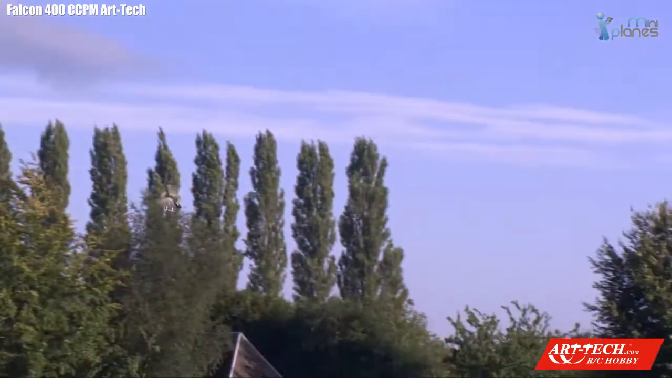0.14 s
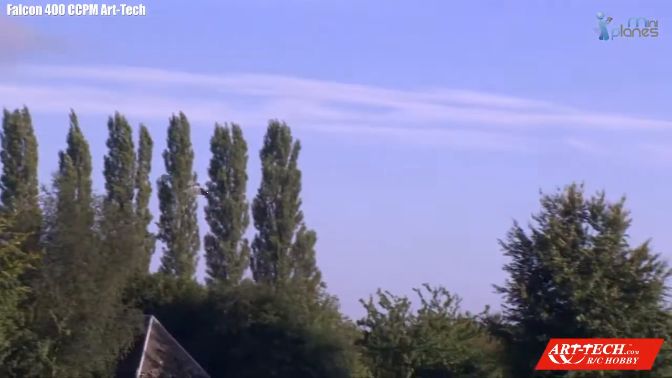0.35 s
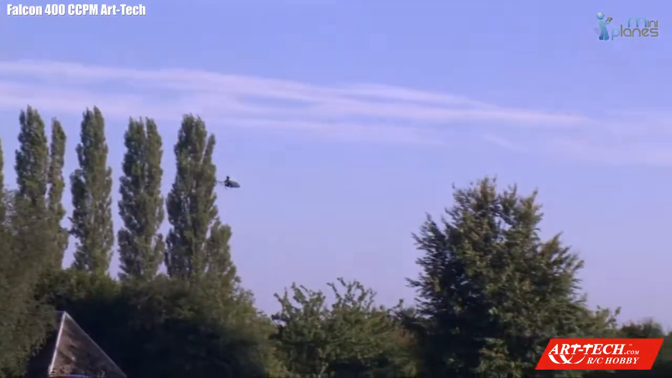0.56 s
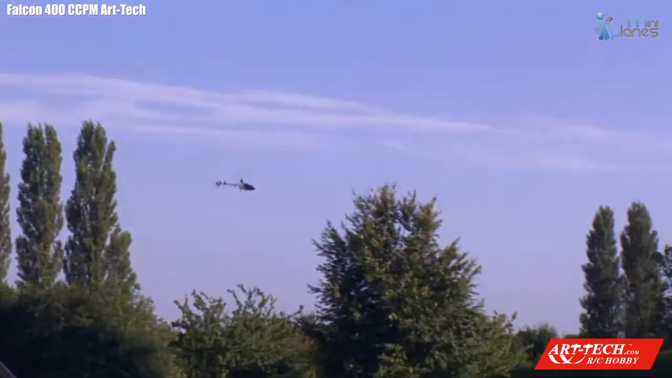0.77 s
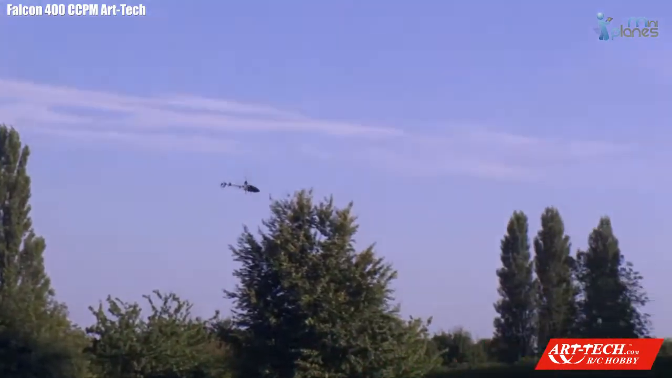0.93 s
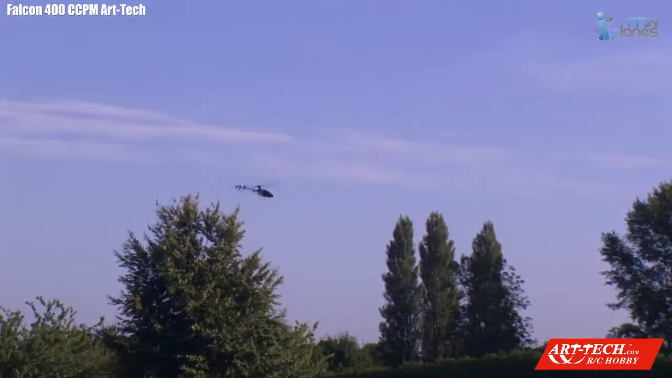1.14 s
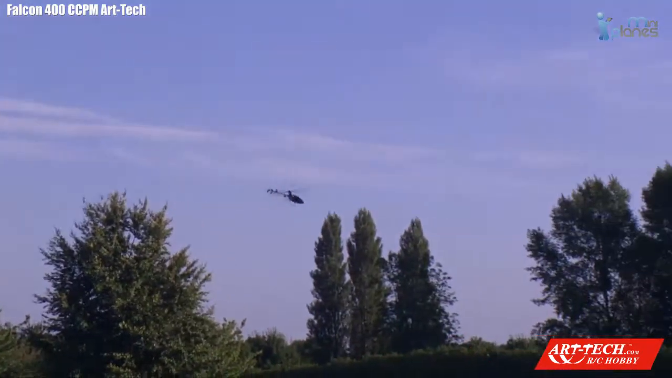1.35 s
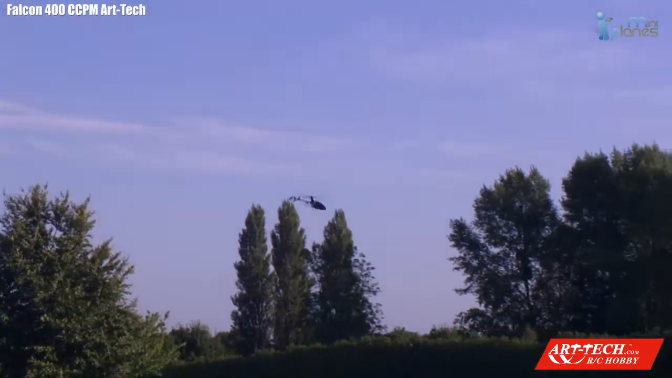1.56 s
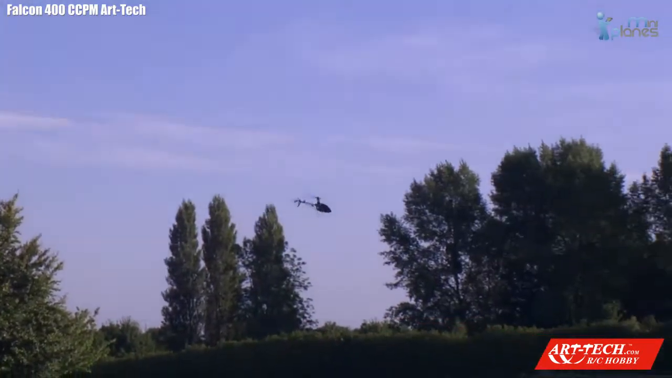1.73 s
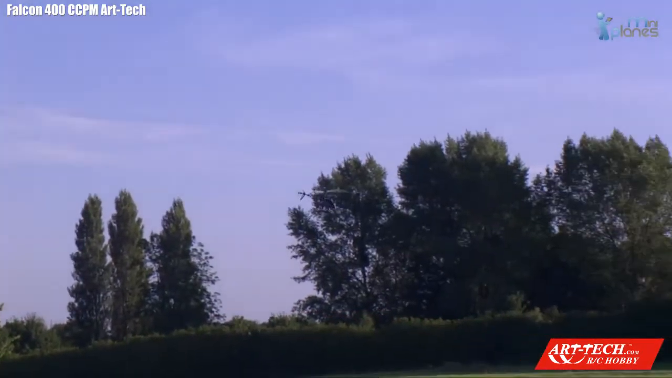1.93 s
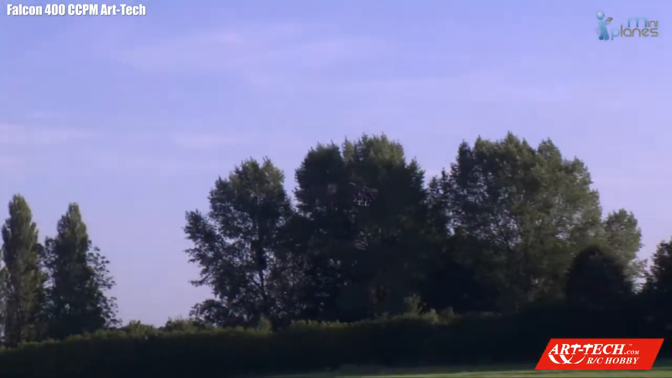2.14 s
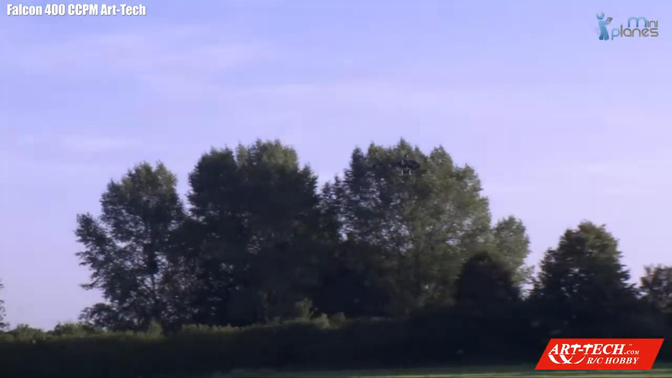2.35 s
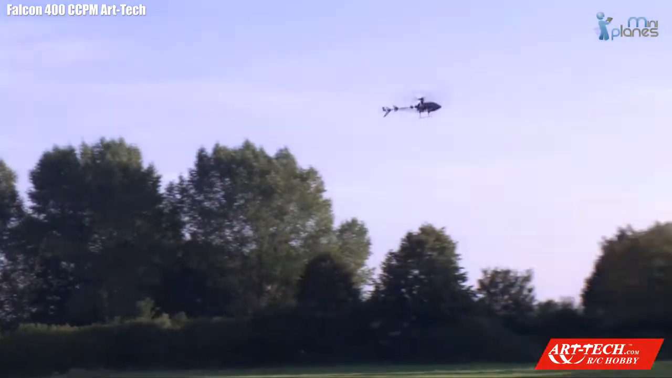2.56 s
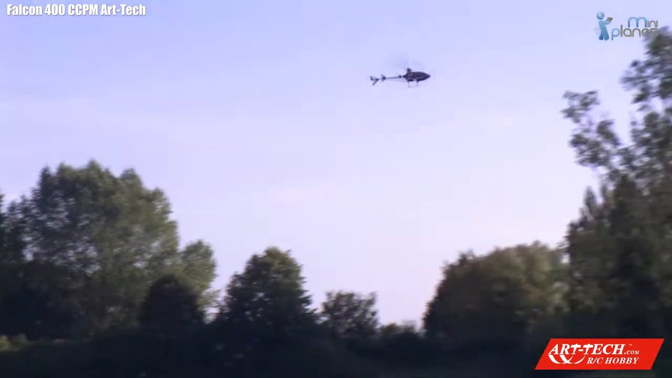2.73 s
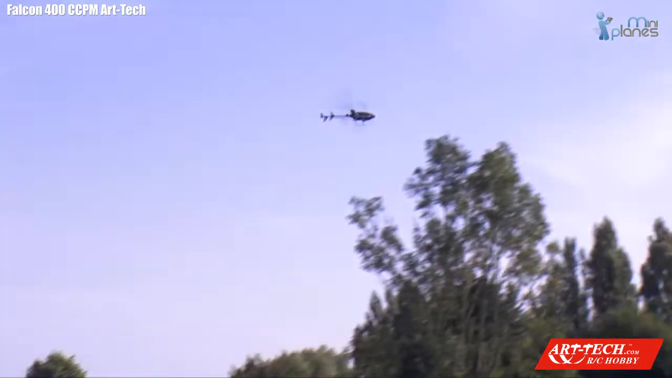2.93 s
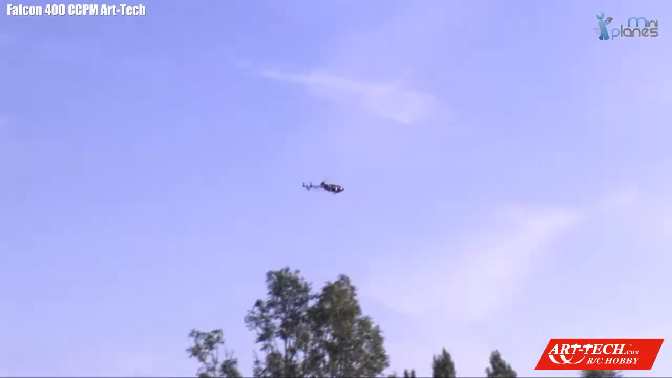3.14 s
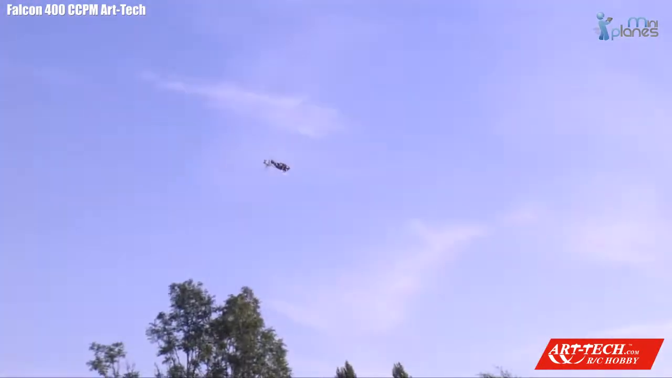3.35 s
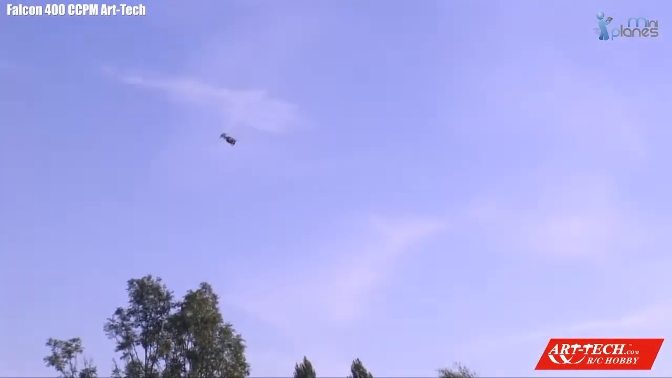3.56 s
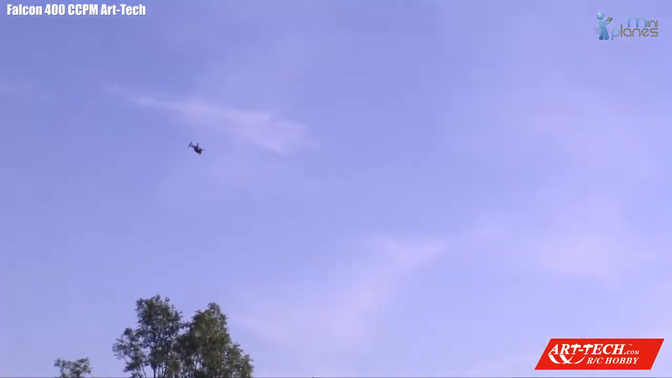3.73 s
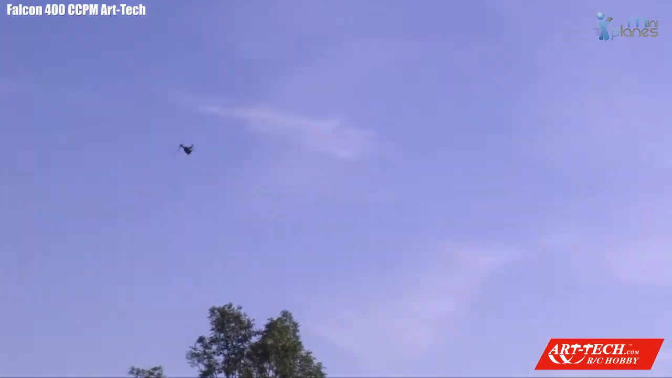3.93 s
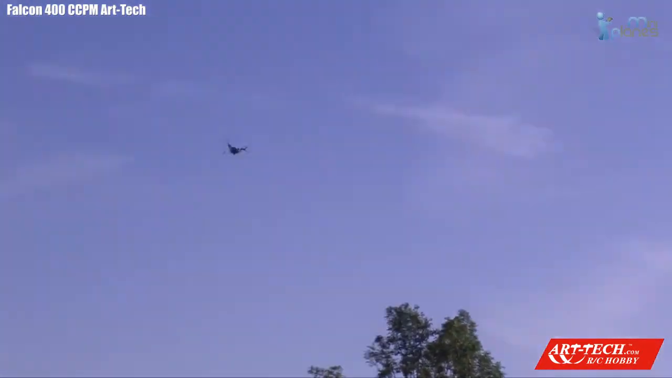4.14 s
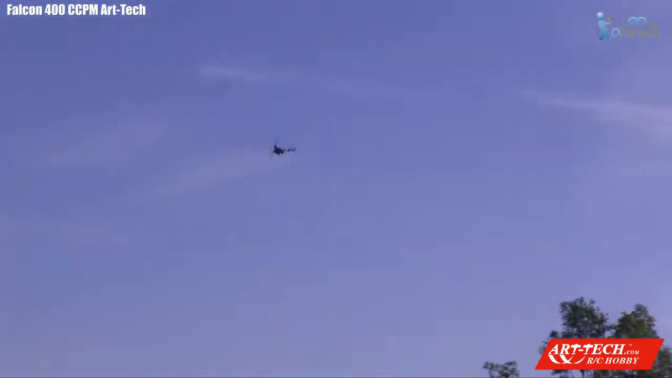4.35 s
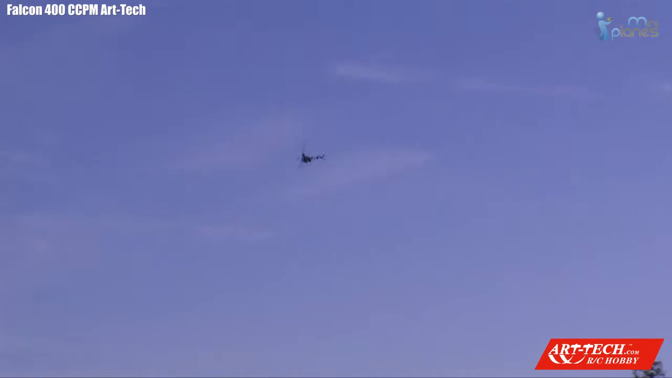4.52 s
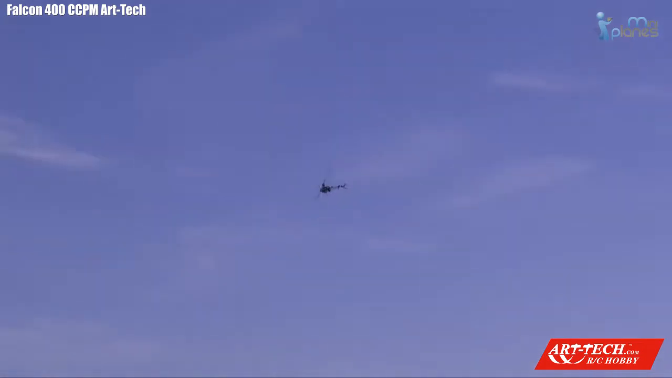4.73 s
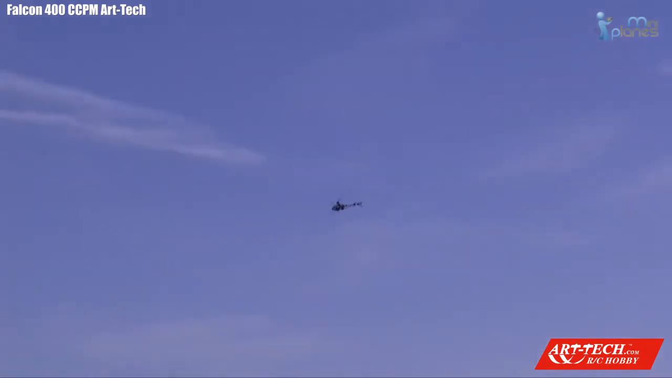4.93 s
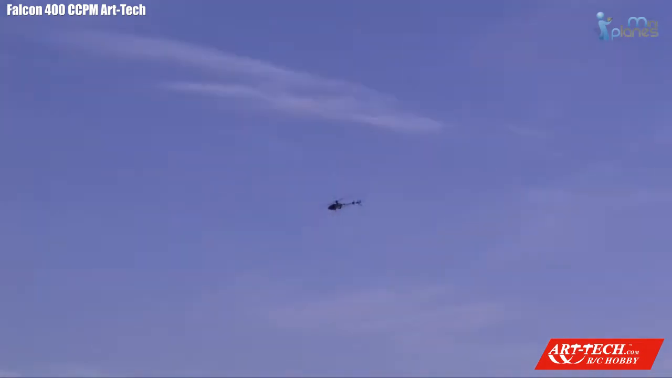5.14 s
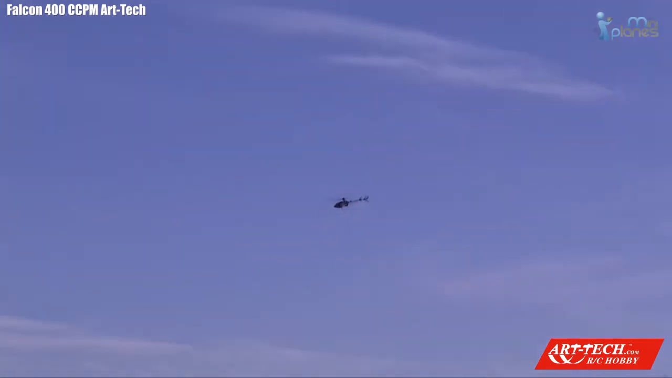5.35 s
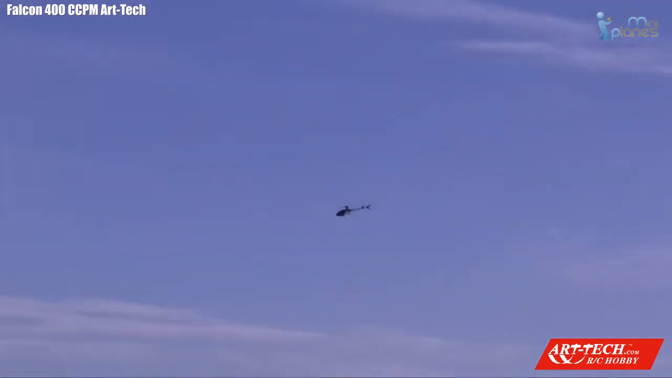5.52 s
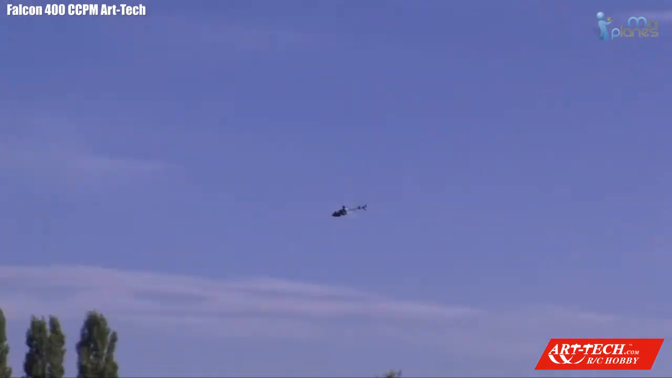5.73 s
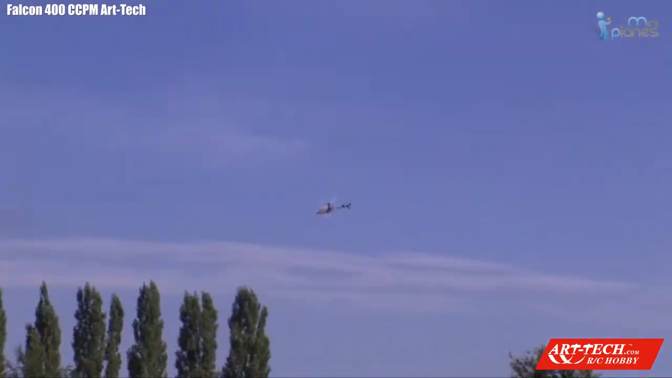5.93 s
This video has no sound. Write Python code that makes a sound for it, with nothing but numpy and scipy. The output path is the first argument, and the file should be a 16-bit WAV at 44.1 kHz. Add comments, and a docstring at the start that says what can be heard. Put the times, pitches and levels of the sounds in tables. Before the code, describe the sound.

Outdoors, the thin, high whine of an electric model helicopter rises and falls gently over surging gear hiss and fluttering rotor noise. It comes closer, turns with a short rasp and a faint buzz, then moves away, still clearly audible. As it passes, wind buffets the microphone in loud, uneven low thumps that die down over a second or two. The field behind it is very quiet.

```python
"""Gear whine and hiss over a blade-chopped rotor swish: a small electric model helicopter above a field.
It comes closest near 3 s, turns from nose-on to tail-on with a rasp and a buzz, and moves off.
One motor angle drives the gear partials and both rotors; trees scatter the whine back.
A gust buffets the microphone with rumble and thumps as the helicopter passes."""
import sys
import numpy as np
from scipy import signal
from scipy.fft import rfft, irfft, next_fast_len
from scipy.io import wavfile
from scipy.ndimage import uniform_filter1d, map_coordinates

SR = 44100
rng = np.random.default_rng(int(sys.argv[2]) if len(sys.argv) > 2 else 0)


def to_wav(s):
    """Save 16-bit WAV."""
    ch = np.atleast_2d(s).T  # columns
    pcm = np.round(np.clip(ch, -1, 1) * 32767)  # PCM
    wavfile.write(sys.argv[1], SR, pcm.astype(np.int16))


N = 263718
TIME_S = np.arange(N) / SR

# Table levels precede the trims in the functions. Swells are bell-shaped.
# motor speed, Doppler included: time_s, speed_hz
MOTOR_SPEED = [(0.0, 280.3), (0.37, 282.2), (0.61, 275.5), (0.83, 271.2), (1.0, 269.5), (1.14, 271.2),
               (1.31, 269.1), (1.6, 268.7), (1.92, 279.3), (2.44, 279.2), (2.6, 270.4), (2.84, 262.7),
               (3.01, 261.2), (3.55, 265.5), (3.93, 268.0), (4.22, 267.4), (4.49, 262.7), (5.05, 262.5),
               (5.45, 265.2), (5.97, 274.0)]
# rotor rush, the base for swish, drone, hiss and fizz: time_s, level_db
RUSH_LEVEL = [(0.0, -50.5), (0.45, -51), (1.66, -50.5), (1.85, -49), (3.05, -49), (3.23, -51.5),
              (3.7, -53.5), (4.45, -55), (5.35, -54.5), (5.85, -52.6), (5.98, -54)]
# strong partials, steady part: motor_multiple, nose_db, tail_db
STRONG_PARTIALS = [(2, -66, -72.5), (8, -64, -67), (10, -57, -63), (11, -64, -66), (16, -68.5, -77),
                   (18, -71, -64), (20, -58.5, -59), (22, -63, -65), (24, -73, -73), (26, -67, -68)]
# flares as a partial's beam sweeps the microphone: centre_s, motor_multiple, peak_db, half_length_s
BEAM_FLARES = [(0.06, 2, -60.5, 0.14), (2.05, 2, -59, 0.25), (2.495, 2, -51.5, .13), (2.852, 2, -59, 0.16),
               (2.72, 8, -56, 0.11), (3.5, 8, -61.5, 0.47), (0.29, 10, -51, 0.2), (1.142, 10, -51, .16),
               (1.55, 10, -53, 0.12), (2.688, 10, -42, 0.1), (3.01, 10, -47.5, 0.09),
               (3.415, 10, -48.5, 0.13), (4.15, 10, -63, .2), (5.105, 10, -52, 0.15),
               (5.76, 10, -55.5, 0.073), (5.96, 10, -48.5, .075), (0.06, 11, -56, 0.089),
               (0.48, 11, -59, 0.093), (1.56, 11, -49.5, 0.047), (1.772, 11, -51, 0.15),
               (2.027, 11, -48.5, 0.085), (3.7, 11, -60.5, 0.29), (4.46, 11, -55, 0.14),
               (4.86, 11, -59, 0.088), (5.7, 11, -59, 0.1), (2.91, 16, -52, 0.029), (3.647, 16, -48.5, .04),
               (3.78, 16, -47.5, .1), (3.99, 16, -53, 0.13), (0.05, 18, -50, 0.12), (2.65, 18, -53, .1),
               (3.38, 18, -53, 0.11), (4.42, 18, -54, 0.51), (0.776, 20, -53.5, .18),
               (0.987, 20, -47, 0.03), (1.135, 20, -44, 0.057), (1.33, 20, -46, 0.064),
               (1.517, 20, -45, 0.046), (1.645, 20, -46, 0.036), (1.84, 20, -51, 0.075),
               (2.33, 20, -45, 0.06), (2.57, 20, -43.5, 0.061), (3.027, 20, -38, 0.032),
               (3.147, 20, -35.5, 0.033), (3.325, 20, -40, 0.04), (3.446, 20, -44.5, 0.067),
               (3.727, 20, -46, 0.089), (4.05, 20, -57, .1), (4.28, 20, -50, 0.07), (4.65, 20, -51, 0.14),
               (5.01, 20, -41.5, 0.062), (5.24, 20, -46, 0.04), (5.325, 20, -44.5, 0.035),
               (0.27, 24, -56, .09), (0.77, 24, -54, .15), (2.03, 24, -49, 0.12), (2.42, 24, -49, 0.093),
               (3.03, 24, -58, 0.085), (3.38, 24, -51.5, .045), (3.82, 24, -52, .07), (4.08, 24, -51, 0.2),
               (5.3, 24, -58, .1), (5.59, 24, -50.5, 0.088), (5.81, 24, -49.5, 0.087), (0.2, 22, -61, 0.27),
               (1.86, 22, -56, .1), (2.52, 22, -56, .08), (1.65, 26, -56, .15), (2.97, 26, -54, .2),
               (5.7, 26, -56, .15)]
# weak motor and tail-drive partials: motor_multiple, nose_relative_db, tail_relative_db
WEAK_PARTIALS = [(6, -26, -30), (9.02, -24, -22), (10.61, -24, -24), (11.15, -28, -22), (12, -26, -20),
                 (13, -31, -25), (14, -26, -23), (18.79, -20, -16.5), (19, -19, -18), (19.2, -28, -19),
                 (19.39, -22, -19), (20.61, -21, -15), (20.76, -19, -17), (21.21, -15, -14),
                 (23.2, -21, -19), (25.21, -24, -19), (28, -20, -22), (29.4, -26, -22), (33, -23, -28),
                 (34.8, -25, -25), (36, -24, -22), (38, -27, -24), (42, -28, -22), (43.2, -32, -23)]
# gear noise surges on banking: centre_s, hiss_peak_db, fizz_peak_db, half_length_s
BANK_SURGES = [(0.02, -46, -68, 0.14), (0.326, -48, -62, 0.088), (1.136, -46.5, -53.5, 0.14),
               (1.584, -45.5, -53, 0.11), (1.905, -53, -53, 0.085), (2.355, -45, -57, 0.041),
               (2.51, -42.5, -59, 0.097), (2.916, -55, -61, 0.056), (3.145, -43, -66, 0.093),
               (3.425, -44, -52.5, 0.1), (3.744, -51.5, -48.5, 0.12), (4.332, -56, -57, 0.14),
               (4.736, -57, -52.5, 0.1), (5.164, -45, -66, 0.023), (5.75, -58, -73, 0.071)]
# rotor-drive drone: motor_multiple, relative_db, swell_peak_db
DRONE_PARTIALS = [(1.66, -14.5, -66), (2.2, -8, -56.5), (2.35, -12.5, -62), (2.5, -13, -67),
                  (2.76, -17, -66), (3.31, -19.5, -65), (4.41, -16, -61.5), (4.7, -21, -59)]
# wind gusts: centre_s, peak_db, half_length_s
WIND_GUSTS = [(1.2, -63, 0.16), (2.553, -51, .12), (2.696, -38, 0.021), (2.817, -32, 0.029),
              (2.892, -30.5, 0.028), (2.969, -26, 0.038), (3.046, -24.5, 0.051), (3.136, -30.5, 0.053),
              (3.346, -31, 0.026), (3.423, -26, 0.051), (3.542, -34.5, 0.021), (3.616, -28.5, 0.025),
              (3.713, -24.5, 0.02), (3.79, -27.5, 0.039), (3.88, -28.5, 0.077), (4.043, -32.5, 0.031),
              (4.125, -37.5, 0.022), (4.247, -38.5, 0.065), (4.36, -34.5, 0.028), (4.487, -43.5, 0.065),
              (4.766, -45, 0.019), (4.916, -51, 0.041), (5.52, -52, 0.19), (5.97, -47, 0.034)]
# single eddies: centre_s, level_db, pitch_hz
EDDIES = [(2.812, -25, 480), (2.841, -14, 190), (2.877, -13, 302), (2.961, -15, 260), (2.977, -14.5, 221),
          (2.992, -16, 201), (3.032, -12, 242), (3.044, -12, 283), (3.366, -17, 240), (3.389, -14, 221),
          (3.413, -17, 228), (3.598, -9, 226), (3.626, -15.5, 240), (3.705, -18, 260), (3.946, -24, 170),
          (4.208, -27, 140), (4.275, -23, 160)]
# main-gear buzz: blade_multiple, peak_db
BUZZ_PARTIALS = [(68, -64), (69, -60), (70, -60.5), (71, -65)]

# noise spectra: freq_hz, relative_density_db
HISS_SPECTRUM = [(2000, -27), (3500, -19), (4300, -9.5), (4800, -2.8), (5300, 0.5), (5800, -2.1),
                 (6800, 2.5), (7800, -1.5), (9000, -5.5), (9700, -14.5), (10500, -18), (14000, -48)]
FIZZ_SPECTRUM = [(6000, -48), (8500, -0.5), (9800, 1), (10700, 3.5), (11700, 2), (12000, -2), (14000, -20)]
SWISH_SPECTRUM = [(25, -40), (80, -26), (200, -8.5), (390, -17), (470, -9), (580, -0.5), (680, 1.5),
                  (820, -9), (1100, -13.5), (2000, -51)]
TIP_NOSE_SPECTRUM = [(500, -32), (830, -9.5), (950, 1.5), (1120, -4.5), (1450, 2), (1750, -4), (1930, 2.5),
                     (2500, -3), (2800, 0.5), (3300, -2), (4100, -7.5), (5500, -16), (9000, -60)]
TIP_TAIL_SPECTRUM = [(500, -25), (780, -1.5), (980, 4), (1250, -0.5), (1850, 0.5), (2200, 1), (2500, 2.5),
                     (2850, 4), (3150, -1), (4100, -5.5), (5500, -2), (9000, -60)]
FIELD_SPECTRUM = [(20, -13), (100, 2.5), (200, -1.5), (300, 3), (900, 0.5), (1600, -4), (3000, -77),
                  (12000, -50)]
RUMBLE_SPECTRUM = [(15, -30), (40, -31), (80, -0.5), (130, 4.5), (220, -2.5), (330, -13), (500, -36),
                   (1100, -53), (6000, -110)]
BUFFET_SPECTRUM = [(30, -40), (100, -23), (170, 3), (250, 0.5), (340, -5.5), (480, -16.5), (700, -25),
                   (1100, -42), (2500, -95), (6000, -110)]
RASP_SPECTRUM = [(1600, -25), (2050, 1), (2330, 11), (2650, -12), (4500, -40), (6000, -6), (6900, -4),
                 (7800, 10), (8600, -1), (9500, -21), (12000, -30)]
# stereo width: freq_hz, side_to_mid_db
HISS_WIDTH = [(4000, -57), (5400, -34), (6800, -35), (8500, -24), (10500, -3)]
FIZZ_WIDTH = [(7000, -6), (9000, -4.5), (10400, -1.5), (11200, -7), (12000, -8)]
# treble ring of the left microphone port: freq_hz, left_minus_right_db
PORT_RING = [(9400, 0), (10000, 3.5), (10700, 4.5), (11400, 5), (12000, -2)]

BLADES, PINION_TEETH, MAIN_GEAR_TEETH = 2, 10, 132
TURN_START_S, TURN_LENGTH_S = 2.2, 0.99


def amp(db):
    """Decibels to gain."""
    return 10 ** (np.asarray(db) / 20)


def unit(x):
    """Scale to rms 1."""
    return x / np.sqrt(np.mean(x ** 2) + 1e-20)


def curve(rows):
    """(time_s, value) rows to one value per sample."""
    return np.interp(TIME_S, *np.transpose(rows))


def wobble(rate_hz):
    """Smooth random curve, rate_hz knots a second."""
    knots = rng.standard_normal(int(N * rate_hz / SR) + 4)
    coarse = np.arange(0, N + 32, 32)
    return np.interp(np.arange(N), coarse, map_coordinates(knots, [coarse * rate_hz / SR]))


def filtered(x, response):
    """Apply the gain response(hz)."""
    size = next_fast_len(N + 8192)
    return irfft(rfft(x, size) * response(np.fft.rfftfreq(size, 1 / SR)), size)[..., :N]


def noise(spectrum, side_db):
    """Stereo noise, rms 1; side_db is one side-to-mid ratio or a width table."""
    def gain(points, hz):
        freq_hz, level_db = np.transpose(points)
        return amp(np.interp(np.log(hz + 1), np.log(freq_hz), level_db))

    width = side_db if np.ndim(side_db) else [(1, side_db)]
    response = lambda hz: gain(spectrum, hz) * np.array([np.ones_like(hz), gain(width, hz)])
    mid, side = filtered(rng.standard_normal((2, N)), response)
    return unit(np.array([mid + side, mid - side]))


def bell(centre_s, sigma_s):
    """Gaussian gain, peak 1."""
    return np.exp(-((TIME_S - centre_s) / sigma_s) ** 2 / 2)


def swelling(base_db, swells):
    """Power sum in dB of a base and (centre_s, peak_db, half_length_s) swells."""
    power = np.ones(N) * amp(base_db) ** 2
    for centre_s, peak_db, half_s in swells:
        near = slice(*np.searchsorted(TIME_S, [centre_s - 4 * half_s, centre_s + 4 * half_s]))
        power[near] += amp(peak_db) ** 2 * np.exp(-((TIME_S[near] - centre_s) / half_s) ** 2)
    return 10 * np.log10(power)


def facing(aspect_rad, nose, tail):
    """Blend from the nose-on value (0 rad) to the tail-on value (pi/2)."""
    return nose + (tail - nose) * np.sin(aspect_rad) ** 2


def chop(angle_rad, depth_db):
    """Gain of rms 1, one brief swell per cycle."""
    return unit(amp(depth_db * (np.cos(angle_rad) + 0.28 * np.cos(2 * angle_rad))))


def tone(angle_rad, multiple, fade_db, flutter_db, scatter):
    """Shaft partial, rms 1; turbulence fades and flutters it, and a rough halo surrounds it."""
    phase = multiple * angle_rad + 2 * np.pi * rng.random() + 0.26 * wobble(8)
    line = (1 + scatter * wobble(220)) * np.sin(phase) + scatter * wobble(220) * np.cos(phase)
    return unit(amp(fade_db * wobble(4.02) + flutter_db * wobble(35)) * line)


def beamed_levels(aspect_rad):
    """Steady level plus beam flares in dB, keyed by motor multiple."""
    level_db = {}
    for multiple, nose_db, tail_db in STRONG_PARTIALS:
        flares = [(s, db, half_s) for s, k, db, half_s in BEAM_FLARES if k == multiple]
        level_db[multiple] = swelling(facing(aspect_rad, nose_db, tail_db), flares)
    return level_db


def mesh_whine(motor_rad, blade_rad, aspect_rad, level_db):
    """Pinion on main gear: each blade loads the mesh and drags the shaft; turbulence shakes the octave."""
    load_db = facing(aspect_rad, 5, 6) + wobble(7.06)  # uneven blade bite
    dragged_rad = motor_rad - 0.012 * np.sin(blade_rad)
    mesh = tone(dragged_rad, PINION_TEETH, fade_db=0.3, flutter_db=1.0, scatter=0.21)
    mesh *= amp(level_db[PINION_TEETH] - 0.1) * chop(blade_rad, load_db)
    shaken_rad = 2 * PINION_TEETH * motor_rad + facing(aspect_rad, 0.47, 0.2) * wobble(35)
    octave = tone(shaken_rad, 1, fade_db=0.1, flutter_db=1.4, scatter=facing(aspect_rad, 0.38, 0.27))
    octave *= amp(level_db[2 * PINION_TEETH] - 0.5) * chop(blade_rad, depth_db=2.0)
    return mesh + octave


def motor_whine(motor_rad, blade_rad, level_db):
    """Strong motor partials; the 4th radiates sideways and peaks in the fly-by."""
    out = amp(level_db[2] + 3) * tone(motor_rad, 2, fade_db=1.0, flutter_db=1.6, scatter=0.24)
    abeam = 1 / (1 + ((TIME_S - 2.74) / 0.25) ** 2)
    out += amp(-57) * abeam * tone(motor_rad, 4, fade_db=0.0, flutter_db=1.0, scatter=0.43)
    out += amp(level_db[16] - 1) * tone(motor_rad, 16, fade_db=1.0, flutter_db=2.0, scatter=0.15)
    chopped_db = {multiple: level_db[multiple] for multiple in (8, 11, 18, 22, 24, 26)}
    chopped_db[40] = level_db[16] - 8.5  # top whistle shares the 16th's beam
    for multiple, db in chopped_db.items():
        partial = tone(motor_rad, multiple, fade_db=0.5, flutter_db=2.5, scatter=0.26)
        out += amp(db + 0.34) * partial * chop(blade_rad, depth_db=1.1)
    return out


def drive_whine(motor_rad, aspect_rad, hiss_db):
    """Weak motor and tail-drive partials; they swell less than the hiss."""
    out = np.zeros(N)
    for multiple, nose_db, tail_db in WEAK_PARTIALS:
        partial = tone(motor_rad, multiple, fade_db=1.5, flutter_db=2.5, scatter=0.18)
        out += amp(facing(aspect_rad, nose_db, tail_db)) * partial
    exposed_db = np.sin(aspect_rad)  # no canopy screening from behind
    swell_db = 0.51 * (hiss_db - np.mean(hiss_db))
    return amp(-47.5 + swell_db + exposed_db) * out


def tooth_rattle(motor_rad, blade_rad, tail_rad, aspect_rad):
    """Gain of rms 1: teeth rattle unevenly, in time with both rotors and the motor shaft."""
    uneven = amp(1.2 * wobble(24.98))
    main = chop(blade_rad, depth_db=facing(aspect_rad, 0.7, 1.1))
    tail = chop(tail_rad, depth_db=0.6) * chop(2 * tail_rad, depth_db=0.55)
    shaft = chop(motor_rad, depth_db=0.45) * chop(2 * motor_rad, depth_db=0.45)
    return unit(uneven * main * tail * shaft)


def gear_hiss(hiss_db, rattle):
    """Treble noise of the rattling teeth."""
    return amp(hiss_db + 0.5) * noise(HISS_SPECTRUM, side_db=HISS_WIDTH) * rattle


def gear_fizz(rush_db, aspect_rad, rattle):
    """Top-treble tooth noise; surges on banking."""
    surges = [(s, db, half_s) for s, _, db, half_s in BANK_SURGES]
    fizz_db = swelling(rush_db + facing(aspect_rad, -4.5, -3.5), surges)
    return amp(fizz_db + 2) * noise(FIZZ_SPECTRUM, side_db=FIZZ_WIDTH) * rattle


def rotor_swish(blade_rad, aspect_rad, rush_db):
    """Main-rotor air noise, chopped at each blade pass."""
    swish_db = rush_db + facing(aspect_rad, -4.5, -3.5)
    return amp(swish_db) * noise(SWISH_SPECTRUM, side_db=-26) * chop(blade_rad, depth_db=1.5)


def tip_rush(motor_rad, blade_rad, aspect_rad, rush_db):
    """Blade-tip noise; ahead, the air is slapped twice a blade pass, and faster by the tail rotor."""
    slap = chop(2 * blade_rad, depth_db=0.9) * chop(2.2 * motor_rad, depth_db=0.6)
    nose = np.cos(aspect_rad) * noise(TIP_NOSE_SPECTRUM, side_db=-63) * slap
    tail = np.sin(aspect_rad) * amp(0.87) * noise(TIP_TAIL_SPECTRUM, side_db=-50)
    return amp(rush_db + 2) * (nose + tail) * chop(blade_rad, depth_db=0.3)


def rotor_drone(motor_rad, aspect_rad, rush_db, swell_s=2.05, half_s=0.23):
    """Low partials of the rotor drive; they swell on the approach."""
    base_db = rush_db + facing(aspect_rad, -2.54, -6.5)
    out = np.zeros(N)
    for multiple, relative_db, peak_db in DRONE_PARTIALS:
        level_db = swelling(base_db + relative_db, [(swell_s, peak_db, half_s)])
        out += amp(level_db) * tone(motor_rad, multiple, fade_db=1.0, flutter_db=2.0, scatter=0.12)
    return out


def off_axis(x, start_lead_s=2e-5, centring_s=0.54):
    """Source starts to one side: the left port leads, then the lead decays."""
    lead_s = start_lead_s * np.exp(-TIME_S / centring_s)
    return x + np.gradient(x, axis=-1) * SR * lead_s * np.array([[0.5], [-0.5]])


def patchy_treble(x, depth_db=2.1, width_hz=170, length_s=0.08):
    """Grainy hiss: narrow bands fade and return at random."""
    size = 1024
    bins = signal.stft(x, nperseg=size)[2]
    patches = uniform_filter1d(rng.standard_normal(bins.shape[1:]), round(width_hz * size / SR), axis=0)
    patches = uniform_filter1d(patches, round(2 * length_s * SR / size), axis=1)
    gain = unit(amp(depth_db * unit(patches)))
    return signal.istft(bins * gain, nperseg=size)[1][:, :N]


def tree_echo(x, delay_s=0.03, t60_s=0.37, level_db=-13.5):
    """Direct sound plus diffuse scatter from the trees; smears each glide."""
    t = np.arange(SR // 2) / SR
    tail = rng.standard_normal(len(t)) * (t > delay_s) * amp(-60 * t / t60_s)
    return x + amp(level_db) * signal.fftconvolve(x, tail / np.linalg.norm(tail))[:N]


def field_rustle():
    """Faint, steady noise of the open field."""
    return amp(-57.5) * noise(FIELD_SPECTRUM, side_db=-5.5)


def wind():
    """Lumpy turbulence on the microphone, mostly antiphase; faster air sheds smaller, brighter eddies."""
    wind_db = swelling(base_db=-72, swells=WIND_GUSTS)
    rumble = amp(wind_db + 1) * noise(RUMBLE_SPECTRUM, side_db=7.5)
    brightness = amp(0.98 * (wind_db + 33))
    buffet = amp(wind_db - 2) * brightness * noise(BUFFET_SPECTRUM, side_db=9.0)
    lumps = unit(amp(2 * wobble(70)))
    return (rumble + buffet) * lumps / np.hypot(1, 0.77 * brightness)


def gear_rasp(tail_rad, rattle):
    """Bright rasp of the open gears, heard side-on."""
    side_on = bell(centre_s=2.93, sigma_s=0.3)
    return amp(-46) * side_on * noise(RASP_SPECTRUM, side_db=-46) * rattle * chop(tail_rad, depth_db=1.0)


def eddy_thumps():
    """Each eddy swings the pressure down and up, antiphase between channels."""
    out = np.zeros(N)
    for centre_s, level_db, pitch_hz in EDDIES:
        phase = np.clip(2 * np.pi * pitch_hz * (TIME_S - centre_s), -20, 20)
        out += amp(level_db) * np.sin(phase) * np.exp(-(phase / 2.4) ** 2)
    return out * np.array([[0.65], [-1.1]])


def gear_buzz(blade_rad):
    """Main gear buzzes at blade-rate overtones coming out of the turn."""
    buzz = sum(amp(db) * tone(blade_rad, multiple, fade_db=1.5, flutter_db=1.0, scatter=0.15)
               for multiple, db in BUZZ_PARTIALS)
    return bell(centre_s=3.76, sigma_s=0.47) * buzz


def helicopter(hunt_hz=0.12):
    """One slightly hunting motor drives the gears, main blades and tail rotor."""
    motor_rad = 2 * np.pi * np.cumsum(curve(MOTOR_SPEED) + hunt_hz * wobble(10)) / SR
    blade_rad = motor_rad * BLADES * PINION_TEETH / MAIN_GEAR_TEETH
    tail_rad = 4 * blade_rad
    aspect_rad = np.pi / 2 * np.clip((TIME_S - TURN_START_S) / TURN_LENGTH_S, 0, 1)
    rush_db = curve(RUSH_LEVEL)
    surges = [(s, db, half_s) for s, db, _, half_s in BANK_SURGES]
    hiss_db = swelling(rush_db + facing(aspect_rad, 2.5, 5), surges)
    partial_db = beamed_levels(aspect_rad)

    swish = rotor_swish(blade_rad, aspect_rad, rush_db)
    tips = tip_rush(motor_rad, blade_rad, aspect_rad, rush_db)
    rattle = tooth_rattle(motor_rad, blade_rad, tail_rad, aspect_rad)
    hiss = gear_hiss(hiss_db, rattle) + gear_rasp(tail_rad, rattle)
    fizz = gear_fizz(rush_db, aspect_rad, rattle)
    drone = rotor_drone(motor_rad, aspect_rad, rush_db)
    treble = patchy_treble(tips + fizz + off_axis(hiss))
    whine = mesh_whine(motor_rad, blade_rad, aspect_rad, partial_db)
    whine += motor_whine(motor_rad, blade_rad, partial_db) + gear_buzz(blade_rad)
    whine += drive_whine(motor_rad, aspect_rad, hiss_db)
    return swish + drone + treble + off_axis(tree_echo(whine))


def scene():
    """Helicopter and wind over the field."""
    return helicopter() + wind() + eddy_thumps() + field_rustle()


def record(dry):
    """Microphone: the ports differ in the top treble; band limit at top_hz."""
    top_hz = 11980
    tilt = lambda hz: amp(np.interp(hz, *np.transpose(PORT_RING)) * np.array([[0.5], [-0.5]]))
    return filtered(dry, lambda hz: tilt(hz) * (hz < top_hz))


dry = scene()
out = record(dry)
to_wav(out)
```